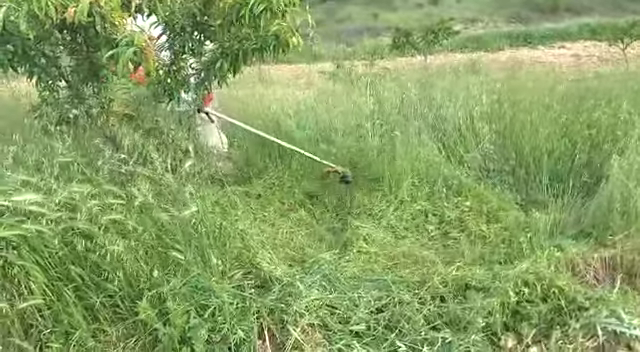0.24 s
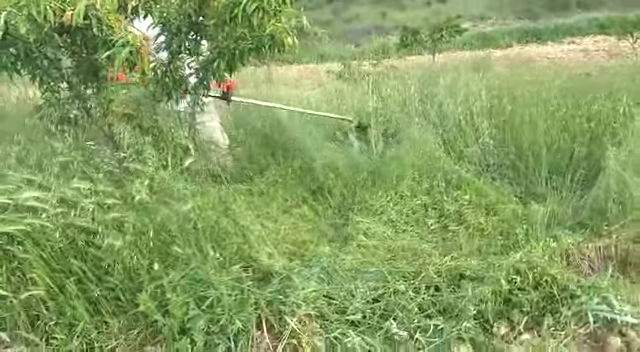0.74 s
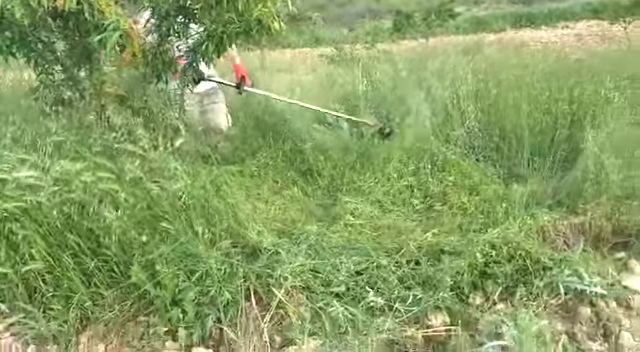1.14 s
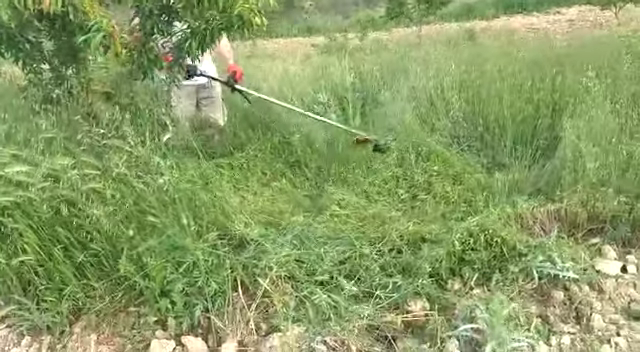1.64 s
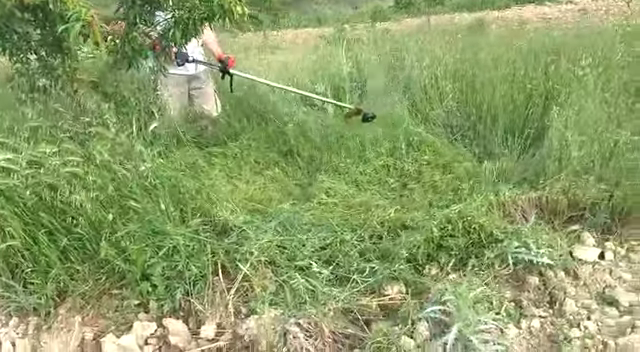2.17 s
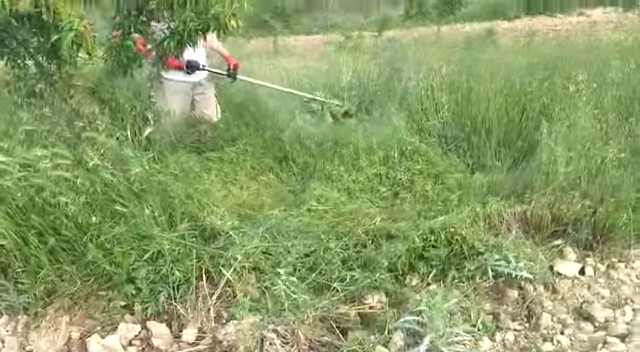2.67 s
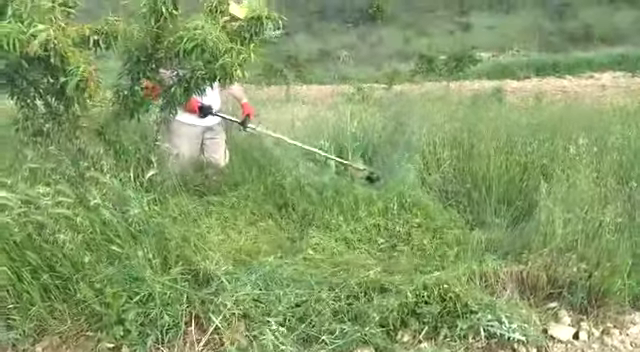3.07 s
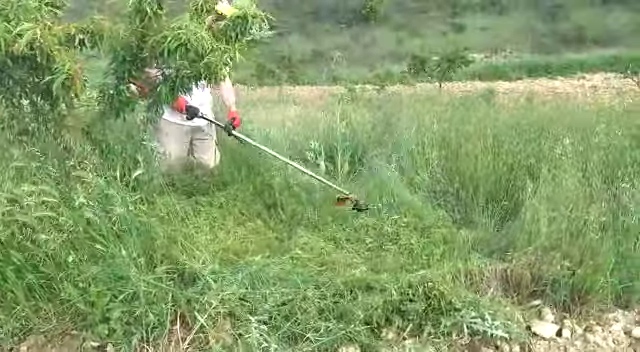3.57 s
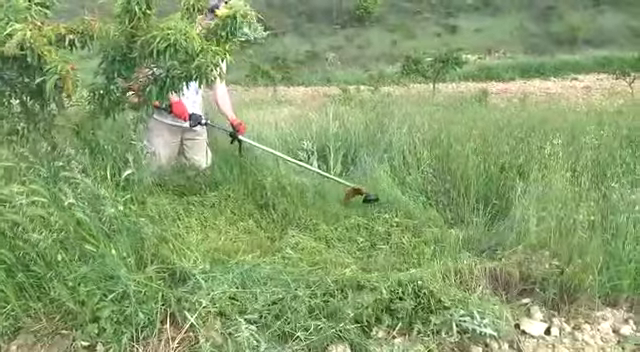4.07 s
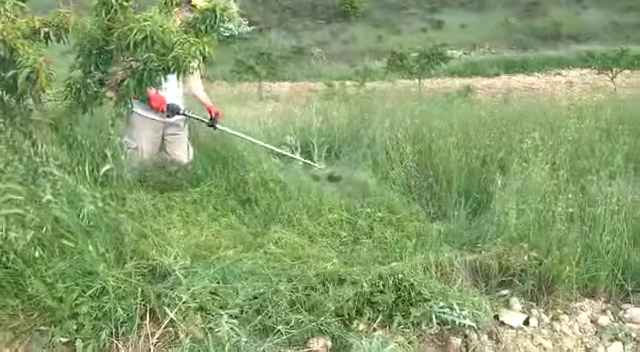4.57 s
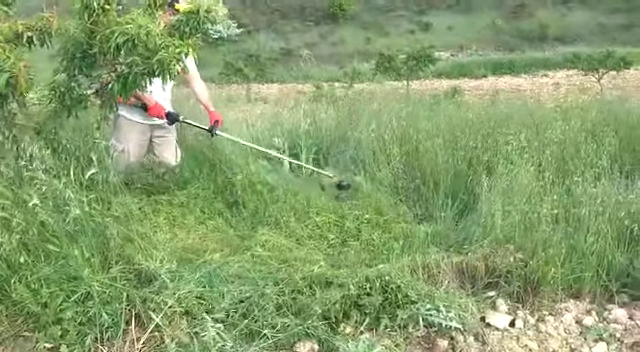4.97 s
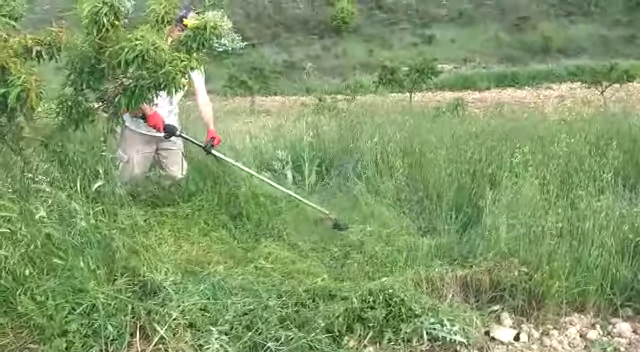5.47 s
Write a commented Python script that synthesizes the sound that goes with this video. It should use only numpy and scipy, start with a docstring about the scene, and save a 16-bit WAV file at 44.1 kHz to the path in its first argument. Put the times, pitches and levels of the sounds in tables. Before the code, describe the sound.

Raspy two-stroke trimmer engine drones and dips in pitch with each cutting sweep, line whooshing, grass hissing, sharp stem clicks, low wind rumble.

```python
"""Brushcutter in tall grass

A two-stroke engine, built from exhaust harmonics over noise puffs, drives a geared head; its revs sag and recover.
Two nylon line ends hum and whoosh as swelling bands of noise, shred grass as hiss and crack on stems as clicks.
Wind rumbles separately on two close microphone ports.
Stereo comes from delaying and subtracting the ports, which combs mid and side.
"""
import sys
import numpy as np
from scipy import signal
from scipy.fft import rfft, irfft
from scipy.io import wavfile
from scipy.ndimage import uniform_filter1d, map_coordinates

SR = 44100
rng = np.random.default_rng(int(sys.argv[2]) if len(sys.argv) > 2 else 0)


def to_wav(sig):
    """Store sig (one row per channel, or 1-D mono) as 16-bit WAV at the path in sys.argv[1].

    Samples outside -1..1 are clipped; the rate is SR.
    """
    pcm = np.clip(np.atleast_2d(sig), -1, 1) * 32767
    pcm = np.round(pcm).astype(np.int16)
    wavfile.write(sys.argv[1], SR, pcm.T)  # frames by channels


N = 252252
TIME_S = np.arange(N) / SR
BIN_HZ = np.maximum(np.arange(N // 2 + 1) * SR / N, 1)
FREE_HZ, LOADED_HZ = 132.16, 107.3   # firing rates running free and under load
HEAD_TURNS_PER_FIRING = 0.735


def from_db(db):
    """Turn a level in dB into an amplitude gain."""
    return 10 ** (np.asarray(db) / 20)


def rms_one(x):
    """Scale to an rms of 1."""
    return x / np.sqrt(np.mean(x ** 2) + 1e-20)


def in_time(rows):
    """Draw straight lines through the points of each column, at every sample."""
    s, *columns = np.transpose(rows)
    return [np.interp(TIME_S, s, column) for column in columns]


def on_hz(points):
    """Read each column of a frequency table at every bin, along log frequency."""
    hz, *columns = np.transpose(points)
    return [np.interp(np.log(BIN_HZ), np.log(hz), column) for column in columns]


def colour(x, spectrum):
    """Shape a sound with a spectral gain curve."""
    gain_db, = on_hz(spectrum)
    return irfft(rfft(x) * from_db(gain_db), N)


def white_pair():
    """Two independent draws of white noise."""
    return rng.standard_normal((2, N))


def butterworth(x, edge_hz, kind):
    """Filter with a Butterworth design of order 2 and the given kind."""
    return signal.sosfilt(signal.butter(2, edge_hz, kind, fs=SR, output="sos"), x)


def drift(rate_hz):
    """Smooth random wander of rms 1, through rate_hz random points per second."""
    knots = rng.standard_normal(int(N / SR * rate_hz) + 2)
    return rms_one(map_coordinates(knots, [TIME_S * rate_hz], order=3))


def throb(turns, sharp):
    """One swell per turn, of rms 1; a higher sharp narrows the swell."""
    return rms_one(np.exp(sharp * np.cos(2 * np.pi * turns)))


def marks(s, size):
    """Single samples of the given sizes at the given times."""
    out = np.zeros(N)
    out[np.round(s * SR).astype(int)] = size
    return out


# Engine speed. Each row: time in seconds, firing rate in Hz.
FIRING_RATE = [(0.0, 134.3), (0.21, 134.8), (0.38, 126.1), (0.51, 109.8), (0.639, 103.1), (0.78, 116.1),
               (0.94, 126.9), (1.14, 131.5), (1.43, 127.8), (1.74, 133.4), (2.02, 136.4), (2.21, 131.3),
               (2.37, 118), (2.55, 113.4), (2.791, 128.2), (3.03, 133.1), (3.22, 132.7), (3.46, 124.5),
               (3.75, 132), (4.01, 134.3), (4.24, 128.6), (4.44, 113.7), (4.64, 116.2), (4.92, 131.9),
               (5.14, 134.8), (5.3, 129.1), (5.43, 119.7), (5.49, 113.5), (5.562, 118.2), (5.72, 127)]


def revs():
    """Firing rate as a smooth cubic through its points: the flywheel allows no corners."""
    s, hz = np.transpose(FIRING_RATE)
    slope = np.gradient(hz, s)
    k = np.clip(np.searchsorted(s, TIME_S) - 1, 0, len(s) - 2)
    step = np.diff(s)[k]
    u = (TIME_S - s[k]) / step   # progress from one point to the next, 0 to 1
    ease = u * u * (3 - 2 * u)
    bend = step * u * (1 - u) * ((1 - u) * slope[k] - u * slope[k + 1])
    return hz[k] + ease * (hz[k + 1] - hz[k]) + bend


# Exhaust harmonics. Each row: multiple of the firing rate, relative level in dB running free, the same under load.
EXHAUST_HARMONICS = [(1, 7.5, 8), (2, -4, -5), (3, 3, -4), (4, -7, 4), (5, -10, 2), (6, -6.5, 0.5),
                     (7, -8, -9.5), (8, -7, -5), (9, -8.5, -9), (10, -16, -8.5), (11, -13, -12),
                     (12, -22.5, -61), (13, -17.5, -37.5), (14, -14.5, -14), (15, -14.5, -20),
                     (18, -57, -20)]
# Muffler resonances the harmonics glide through. Each row: centre in Hz, half-width in Hz, peak boost or cut in dB.
MUFFLER_RESONANCES = [(416, 91, 0.5), (654, 250, -3), (953, 91, 7), (1510, 64, 2.5)]


def exhaust_tone(hz, turns, load):
    """Harmonics of the firing rate waver in level and phase as they glide through the muffler resonances."""
    shaky = turns + (0.0028 + 0.0071 * load) * drift(60)   # no two firings are quite evenly spaced
    loose = np.clip(0.75 - 0.35 * load, 0.1, 2)   # under load the harmonics lock into one sharp beat
    tone = 0
    for multiple, free_db, load_db in EXHAUST_HARMONICS:
        body_db = sum(peak_db / (1 + ((multiple * hz - centre_hz) / width_hz) ** 2)
                      for centre_hz, width_hz, peak_db in MUFFLER_RESONANCES)
        level_db = free_db + load * (load_db - free_db) + body_db
        gain = from_db(level_db + 1.56 * drift(4.846) + 0.77 * drift(30))
        tone = tone + gain * np.sin(2 * np.pi * multiple * shaky + loose * drift(2.956))
    return tone


# Casing resonance that lifts the gear whine. One row: centre in Hz, half-width in Hz, relative level on top in dB.
CASING_RESONANCE = (2925, 85, -13)


def gear_whine(hz, turns):
    """Tones at 22 and, weaker, 23 times the firing rate swell as they pass the casing resonance."""
    centre_hz, width_hz, whine_db = CASING_RESONANCE
    tone = 0
    for mesh, less_db in [(22, 0), (23, -4)]:
        swell = 1 / (1 + ((mesh * hz - centre_hz) / width_hz) ** 2)
        gain = from_db(whine_db + less_db + 4.2 * drift(7)) * swell
        tone = tone + gain * np.cos(2 * np.pi * mesh * turns + 0.5 * drift(40))
    return tone


# Noise of the exhaust puff. Each row: frequency in Hz, relative spectral gain in dB.
PUFF_SPECTRUM = [(60, -2), (200, -1), (310, -25), (500, -9), (1000, -15.5), (1600, -8), (2200, -13),
                 (3000, -7), (4500, -16.5), (8000, -64)]
# Sharp edge of each firing. Each row: frequency in Hz, relative spectral gain in dB.
RASP_SPECTRUM = [(1200, -4), (2000, -10.5), (4000, -11.5), (7000, -17)]


def exhaust_puff(turns, load):
    """Noise swells with each firing, more sharply under load, with a raspy edge on top; two draws."""
    rasp = colour(white_pair() * throb(turns, 0.9), RASP_SPECTRUM)
    puff = colour(white_pair() * throb(turns, 0.072 + 0.37 * load), PUFF_SPECTRUM)
    return rms_one(puff + from_db(-1.5) * rasp)


def engine(hz, turns, level_db):
    """Exhaust harmonics and gear whine over a noise puff at each firing."""
    load = np.clip((FREE_HZ - hz) / (FREE_HZ - LOADED_HZ), -0.2, 1.3)   # 0 running free, 1 loaded
    tone = exhaust_tone(hz, turns, load) + gear_whine(hz, turns)
    return from_db(level_db) * (from_db(2.5) * tone + from_db(-1.5) * exhaust_puff(turns, load))


# Hum of the head. Each row: multiple of the head's turning rate, relative level in dB.
HUM_HARMONICS = [(1, -7), (2, 5), (6, -19.5)]


def head_hum(turns, level_db):
    """The two line ends pump air twice a turn, heard as a few low harmonics of the head."""
    tone = sum(from_db(db) * np.sin(2 * np.pi * multiple * turns + 0.46 * drift(15))
               for multiple, db in HUM_HARMONICS)
    return from_db(level_db + 10) * tone


# Air noise of the line. Each row: frequency in Hz, relative spectral gain in dB.
WHOOSH_SPECTRUM = [(2000, -18.5), (3500, -8.5), (4600, -2), (5500, -1.5), (6200, -3), (7200, 2), (8300, -9),
                   (9500, -1.5), (11500, -14.5), (13000, -30), (16000, -23)]


def whoosh(turns, level_db, bright_db):
    """Air torn by the line swells as each end swings toward the listener; the top band swells later and sharper."""
    out = 0
    uneven = from_db(0.5 * drift(90) + 0.67 * drift(12))
    # one end is longer, heard most in the treble
    longer_db = 3.6 * np.cos(2 * np.pi * turns + 0.81 * drift(1.49))
    # low and high edge in Hz, lateness in swells, sharpness, share of the brightness from 0 to 1
    bands = [(1500, 7560, 0, 0.36, 0), (5500, 8270, 0.016, 0.17, 0.48), (8700, 21200, 0.44, 2, 1)]
    for low_hz, high_hz, late, sharp, lift in bands:
        gain = from_db(lift * (bright_db + longer_db) + 1.15 * drift(25.18))
        swell = throb(2 * turns - late, sharp) * gain
        out = out + butterworth(white_pair() * swell * uneven, [low_hz, high_hz], "band")
    return from_db(level_db + 4) * rms_one(colour(out, WHOOSH_SPECTRUM))


def snaps(at, level_db):
    """Each blow is a sharp click with a fast-fading splinter of noise; two draws."""
    clicks = np.zeros(N)
    clicks[at] = from_db(level_db)
    fade = np.exp(-1 / (0.00035 * SR))   # time constant of 0.35 ms
    splinter = signal.lfilter([1], [1, -fade], clicks) * rng.standard_normal((2, N))
    return clicks + 0.35 * splinter


# Colour of torn grass and struck stems. Each row: frequency in Hz, relative spectral gain in dB.
SHRED_SPECTRUM = [(1500, 4), (2500, 1), (4500, 2.5), (7500, 2), (9000, -4.5), (12000, -0.5), (16000, -2.5)]


def shredding(turns, level_db):
    """Blades of grass hiss as they tear; each line pass snaps a stem, mostly softly, at times hard."""
    passes = np.flatnonzero(np.diff(np.floor(2 * turns)) > 0)
    sizes = np.minimum(rng.exponential(1, len(passes)), 4)
    hiss = white_pair() * from_db(0.82 * drift(40))
    brittle = butterworth(snaps(passes, 15 + 3.4 * sizes), 7000, "high")
    return from_db(level_db + 16.5) * rms_one(colour(hiss + brittle, SHRED_SPECTRUM))


# Line end on a thick stem. Each row: time in seconds, relative level in dB.
STEM_CRACKS = [(0.2154, -16), (0.4154, -21), (0.5999, -20), (2.2986, -9), (2.3153, -10), (2.4534, -15),
               (2.5491, -16), (4.0184, -11), (4.028, -7), (4.0384, -10), (4.0694, -15), (4.0896, -6),
               (4.111, -12), (4.38, -13), (5.1559, -22), (5.2077, -12)]


def cracks():
    """The hardest blows on stems: clicks and splinters in the colour of the shredding."""
    s, db = np.transpose(STEM_CRACKS)
    return colour(snaps(np.round(s * SR).astype(int), db + 10), SHRED_SPECTRUM)


# Gusts on the ports, strong and faint. Each row: time of the peak in seconds, relative level in dB.
WIND_GUSTS = [(.14, -35), (.99, -53), (1.41, -48), (1.55, -46), (1.75, -33), (1.87, -32), (2.119, -36),
              (2.47, -33), (2.81, -37), (2.96, -33), (3.24, -50), (3.4, -45), (3.48, -37), (3.58, -30),
              (3.9, -32.5), (4.0, -37), (4.351, -33), (4.59, -37), (4.89, -36)]
# Rumble of the wind. Each row: frequency in Hz, relative spectral gain in dB.
GUST_SPECTRUM = [(20, -26), (45, 0.5), (80, 3), (130, -1.5), (200, -15.5), (350, -42), (700, -30),
                 (1500, -100)]
GUST_WIDTH_S = 0.031   # standard deviation of the bell-shaped swell
BREEZE_DB, BREEZE_SWING_DB = -41, 2   # relative level of the steady breeze, and its wander


def wind():
    """Lumpy turbulence, each port its own; a stronger gust reaches higher in pitch."""
    s, db = np.transpose(WIND_GUSTS)
    swell_s = np.arange(-SR // 4, SR // 4) / SR
    swell = np.exp(-0.5 * (swell_s / GUST_WIDTH_S) ** 2)
    breeze = from_db(BREEZE_DB + BREEZE_SWING_DB * drift(9))
    gain = breeze + np.abs(signal.fftconvolve(marks(s, from_db(db)), swell, "same"))
    rumble = rms_one(colour(white_pair() * from_db(3.6 * drift(30)), GUST_SPECTRUM))
    flutter = butterworth(rumble, 150, "high")
    return from_db(1.5) * gain * (rumble + flutter * (gain / from_db(-40)) ** 0.44)


# Difference of the ports against their sum for far sound. Each row: frequency in Hz, level in dB,
# phase in radians, share that follows the sum from 0 to 1.
PORT_DIFFERENCE = [(100, -56, 0.51, .5), (400, -29, -0.24, 0.55), (690, -18, -0.095, 0.5),
                   (1730, -9.5, -0.42, 0.41), (2920, -0.5, -0.59, 0.66), (4100, 0, 0.59, 0.85),
                   (5300, 1.5, 0.56, 0.76), (6500, 1.5, 0.85, .8), (7500, -5, -0.06, 0.39),
                   (8600, 2, 0.72, 0.57), (10000, -1, .8, 0.62), (13000, 2.5, .8, .4), (16000, -3, .8, .3)]


def ports(near, other):
    """Far sound reaches both ports nearly alike: their difference is weak in the bass and partly unrelated."""
    level_db, phase, share = on_hz(PORT_DIFFERENCE)
    share = np.clip(share, 0, 1)
    mix = share * rfft(near) + np.sqrt(1 - share ** 2) * rfft(other)
    difference = irfft(from_db(level_db) * np.exp(1j * phase) * mix, N)
    return np.array([near + difference, near - difference]) / 2


# Whoosh, choked in thick grass and loud as the line swings free. Each row: time in seconds, relative level in dB.
WHOOSH_LEVEL = [(0, -33.5), (.2, -31.5), (.4, -36), (.57, -35), (.85, -26.5), (1.16, -24.5), (1.5, -29),
                (2.2, -27.5), (2.5, -34.5), (2.67, -26), (2.95, -21.5), (3.32, -29), (3.65, -30.5),
                (3.98, -26.5), (4.1, -28.5), (4.48, -32), (4.7, -25.5), (5.07, -22), (5.22, -28),
                (5.72, -32.5)]
# Slow changes as the machine swings, at free revs. Each row: time in seconds, relative exhaust level in dB,
# relative shredding level in dB.
SWING_LEVELS = [(0, -33, -44.5), (.5, -29.5, -45.5), (1.2, -32.5, -48), (1.85, -29.5, -44.5),
                (2.4, -30, -47), (3.2, -32.5, -48.5), (3.65, -31, -46), (3.95, -30, -45),
                (4.5, -29.5, -44.5), (5.1, -30.5, -48.5), (5.25, -31.5, -45.5), (5.72, -28, -45.5)]
# Change for each Hz that the revs sag. One row: exhaust, hum, whoosh brightness, shredding, all in dB per Hz.
SAG_CHANGE = (-0.082, -.45, -0.36, -0.15)
# Change for each Hz per second that the revs fall as the line bites. One row: exhaust, hum, whoosh brightness,
# shredding, all in dB per Hz/s.
BITE_CHANGE = (0.00038, -0.026, 0.019, 0.037)
HUM_DB, BRIGHT_DB = -38.5, 3   # relative hum level and whoosh brightness running free
BITE_SMOOTH_S = 0.033


def scene():
    """Pressure at the two ports: the revs steer engine, head and grass, with wind added at each port."""
    hz = revs()
    falling = -uniform_filter1d(np.gradient(hz) * SR, int(BITE_SMOOTH_S * SR))   # Hz per second
    whoosh_db, = in_time(WHOOSH_LEVEL)
    exhaust_db, grass_db = in_time(SWING_LEVELS)
    free_levels = (exhaust_db, HUM_DB, BRIGHT_DB, grass_db)
    engine_db, hum_db, bright_db, shred_db = [
        db + sag * (FREE_HZ - hz) + bite * falling
        for db, sag, bite in zip(free_levels, SAG_CHANGE, BITE_CHANGE)]
    engine_turns = np.cumsum(hz) / SR   # one turn per firing
    head_turns = HEAD_TURNS_PER_FIRING * engine_turns
    far = engine(hz, engine_turns, engine_db) + head_hum(head_turns, hum_db)
    far = far + whoosh(head_turns, whoosh_db, bright_db)
    far = far + shredding(head_turns, shred_db) + cracks()
    return ports(*far) + wind()


# Abrupt drops of the whole sound. Each row: time in seconds, added drop in dB.
LEVEL_DIPS = [(0, 1), (0.218, 4), (.417, 5.5), (1.95, 1.5), (2.301, 1.5), (2.455, 0.5), (3.27, 1),
              (4.0291, 12), (5.158, 3.5), (5.46, 0.5)]
DIP_RECOVERY_S = 0.48   # time constant


def dips():
    """Gain that falls at once at each dip and recovers exponentially in dB."""
    keep = np.exp(-1 / (DIP_RECOVERY_S * SR))
    drop_db = signal.lfilter([1], [1, -keep], marks(*np.transpose(LEVEL_DIPS)))
    return from_db(-drop_db)


LAG_S, LAG_DULL_HZ = 1 / 2325, 15000   # delay between ports, and where the delayed copy is halved
CUTOFF_HZ = 15750


def record(dry):
    """Each side is its port minus the other port delayed and slightly dulled; the level dips; the top is cut."""
    lag = np.exp(-2j * np.pi * BIN_HZ * LAG_S) / (1 + (BIN_HZ / LAG_DULL_HZ) ** 3)
    sides = dry - irfft(rfft(dry[::-1]) * lag, N)
    low_pass = signal.ellip(12, 0.5, 75, CUTOFF_HZ, fs=SR, output="sos")   # ripple 0.5 dB, stopband 75 dB down
    return signal.sosfilt(low_pass, sides * dips())


dry = scene()
out = record(dry)
to_wav(out)
```